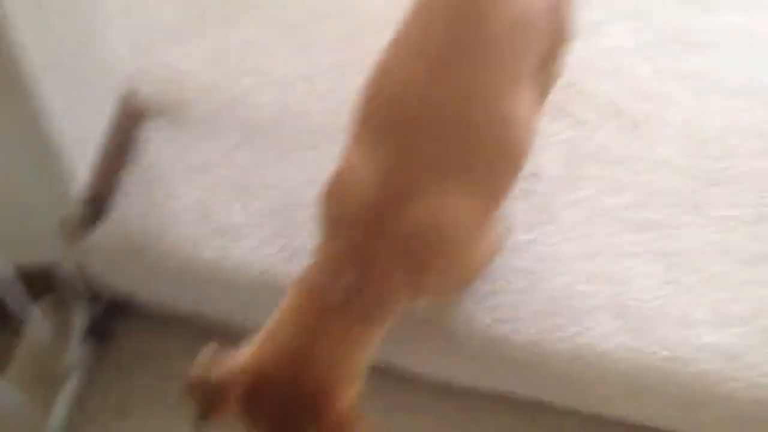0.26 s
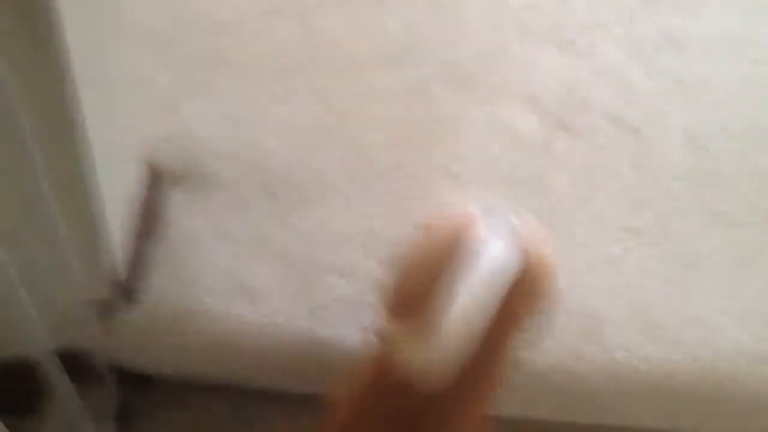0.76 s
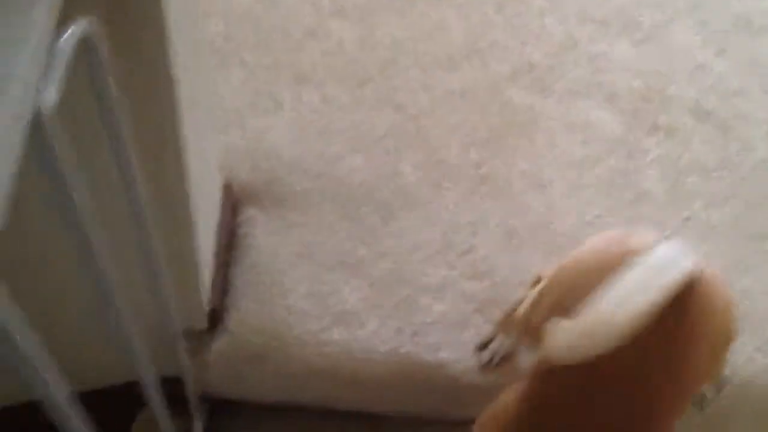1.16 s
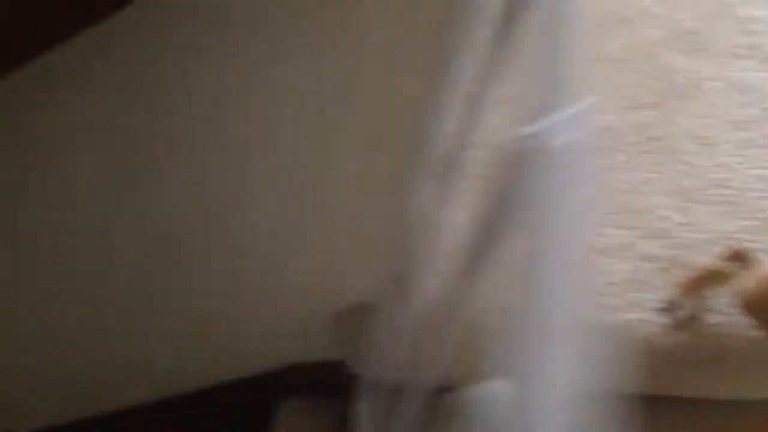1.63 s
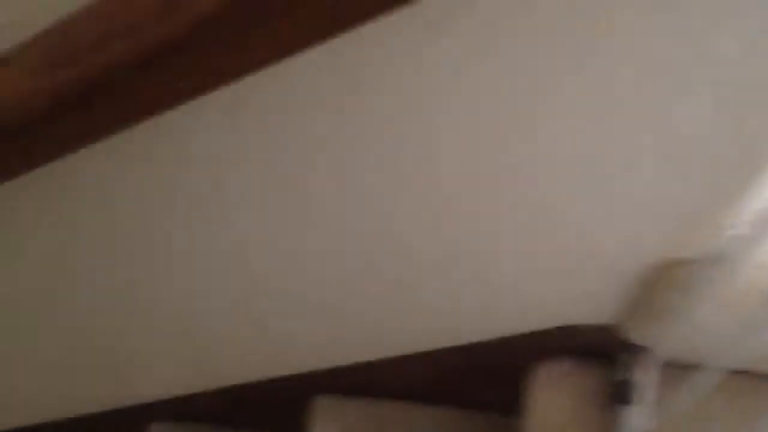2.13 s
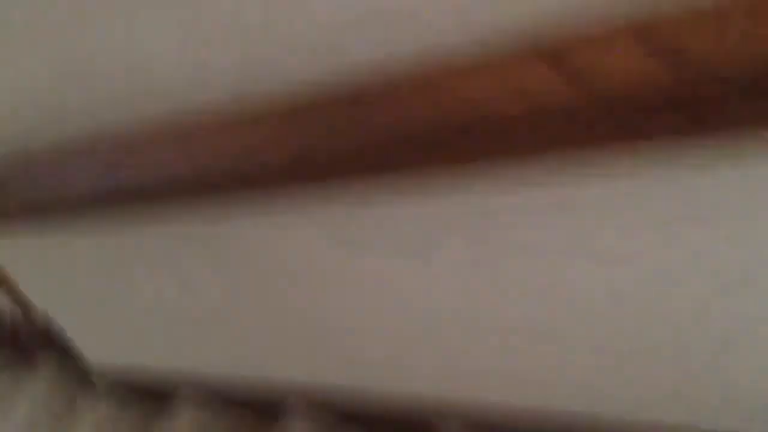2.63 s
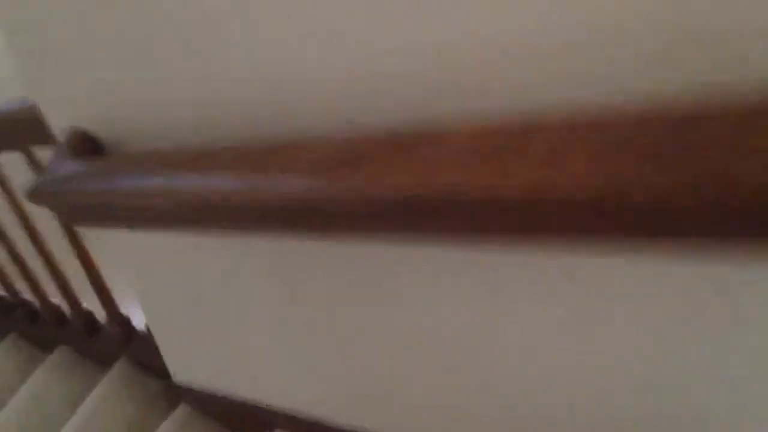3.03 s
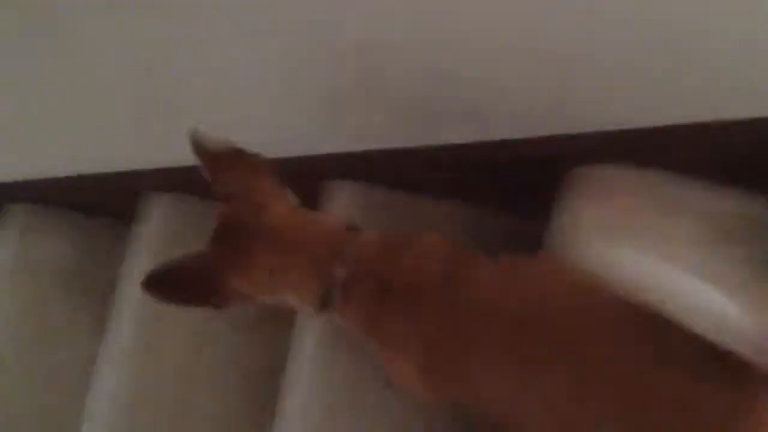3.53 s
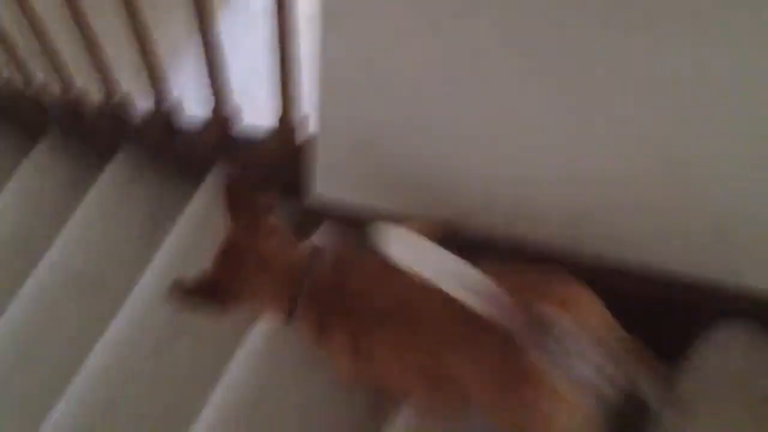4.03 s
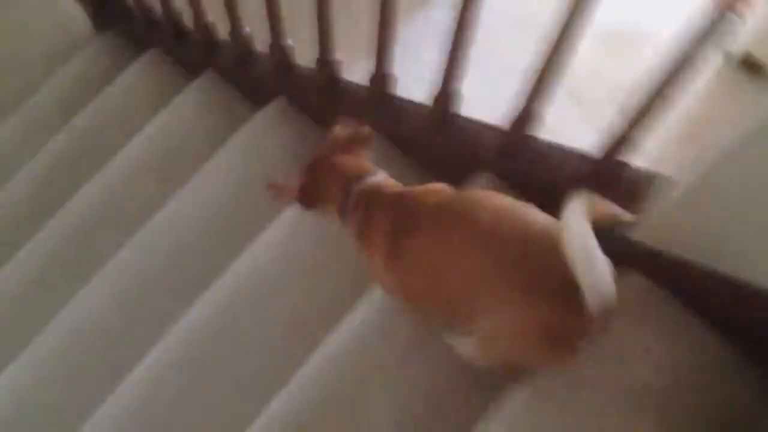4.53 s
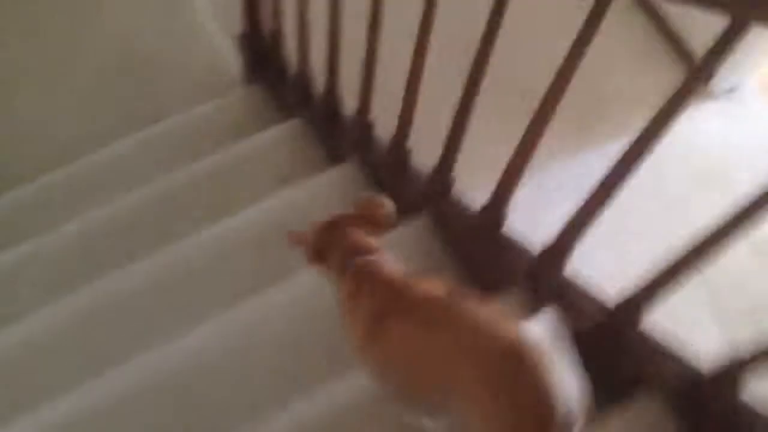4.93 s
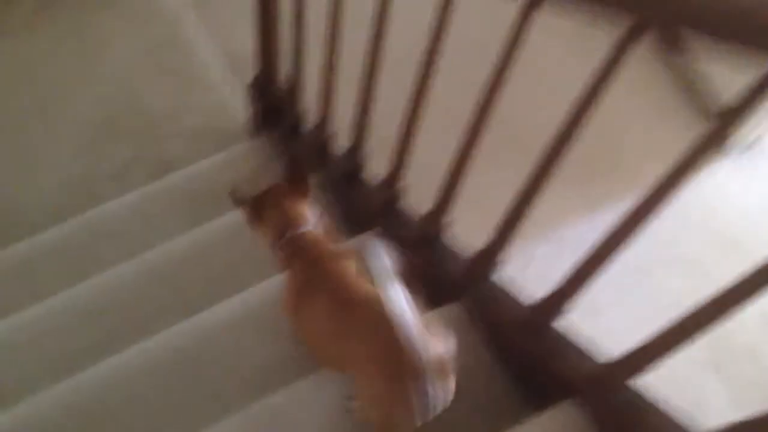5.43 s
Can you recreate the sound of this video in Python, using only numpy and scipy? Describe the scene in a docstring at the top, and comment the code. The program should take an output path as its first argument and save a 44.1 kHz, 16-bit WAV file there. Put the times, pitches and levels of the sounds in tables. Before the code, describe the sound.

A small handheld microphone is carried down a carpeted indoor stair, with thin bass and steady soft hiss throughout. At first there are only faint muffled thuds and carpet scuffs, with a short double metallic gate-latch clack around 0.3 s and a brief stairwell tail. A quiet lull follows, with a few weak steps near 1.5 s. At about 1.86 and 1.99 s two very loud, hard, bright ticks hit right at the microphone. Smaller ticks and dry rubbing follow; a sharp tick at 2.6 s leads to a cluster from 2.7 to 2.9 s, then a denser run of clicks and scrapes from 3.27 to 3.6 s. Dull footfalls grow more noticeable from 3.1 s. Scattered ticks continue to 3.9 s, a barely audible high squeak slides by near 4.4 s, and strong single clicks land at 4.48, 5.0 and 5.2 s. Lighter ticking and rubbing trail off to the end.

```python
"""One hears hard, bright ticks and dry rubbing at the microphone, thudding feet, a latch clack and steady hiss.
The place is a carpeted stair: someone carries a small camera down after a dog, which is itself not heard.
Close to the microphone a small hard thing rings in short modes, struck once per tick, by dense slips when rubbed.
Farther off, noise grains make thuds and scuffs on carpet, and a gate latch rings into the stairwell's tail.
Jolts push the microphone, and a faint gliding tone squeaks; the microphone cuts the bass and adds hiss."""
import sys
import numpy as np
from scipy import signal
from scipy.fft import rfft, irfft
from scipy.io import wavfile
from scipy.ndimage import uniform_filter1d

SR = 44100
rng = np.random.default_rng(int(sys.argv[2]) if len(sys.argv) > 2 else 0)


def boost_factor(decibels):
    """Convert a level in decibels to a linear amplitude factor."""
    exponent = np.asarray(decibels, float) / 20
    return 10 ** exponent


def generate_wav(signal):
    """Clip the signal to [-1, 1] and save it as 16-bit WAV at the path in sys.argv[1]."""
    frames = np.transpose(np.atleast_2d(signal))
    scaled = np.clip(frames, -1, 1) * 32767
    pcm = np.round(scaled).astype(np.int16)
    wavfile.write(sys.argv[1], SR, pcm)


N = 250929

# Levels in the tables are those ahead of the microphone's bass cut and soft ceiling.
# Hiss spectrum: (frequency [Hz], relative level per Hz [dB])
HISS_SPECTRUM = [(29, -59), (50, -32.5), (107, -4.5), (177, -0.5), (449, -9), (1040, -10.5), (1140, -8.5),
                 (1280, -9), (1840, -10.5), (2820, -13), (15000, -11.5)]
# Footfalls on the carpet:
# (time [s], length [s], thud rms level [dB], thud frequency [Hz], scuff rms level [dB])
FOOTFALLS = [(0.232, 0.14, -70, 227, -65), (0.317, 0.1, -67, 252, -66), (.419, .035, -70, 267, -70),
             (0.522, 0.064, -75, 248, -63.5), (0.628, 0.033, -62, 300, -63), (.672, .066, -62, 185, -71),
             (1.292, 0.038, -69, 260, -87), (1.52, 0.019, -57.5, 265, -80), (1.607, 0.014, -68, 278, -72),
             (1.896, 0.072, -58, 200, -63.5), (2.56, 0.075, -69, 196, -66), (2.657, 0.091, -58, 224, -68),
             (2.768, 0.046, -60, 140, -84), (2.802, 0.11, -61, 150, -70), (3.118, 0.06, -50.5, 188, -86),
             (3.178, 0.097, -56, 194, -68), (3.24, 0.22, -61, 215, -67.5), (3.449, 0.137, -54, 171, -67),
             (3.69, .08, -65, 210, -62), (3.777, 0.1, -53, 212, -59.5), (3.883, 0.089, -61, 212, -64.5),
             (3.984, 0.016, -59, 285, -55), (4.007, .055, -60, 190, -66), (4.064, 0.027, -64, 232, -62),
             (4.155, 0.016, -62, 318, -72), (4.268, 0.075, -55, 256, -70),
             (4.373, 0.072, -65.5, 201, -66.5), (4.445, 0.066, -66, 270, -64),
             (4.633, 0.065, -59.5, 270, -66.5), (4.692, 0.06, -72, 279, -65), (4.741, 0.02, -52, 136, -84),
             (4.81, 0.079, -59, 140, -82), (4.915, 0.033, -53, 282, -61.5), (4.951, .09, -63, 243, -63.5),
             (5.021, 0.1, -60.5, 180, -78), (5.171, 0.079, -60, 170, -85), (5.335, 0.13, -60, 191, -69),
             (5.458, 0.071, -72, 209, -65.5), (5.576, 0.032, -72, 296, -60), (5.608, .075, -65.5, 232, -66)]
# General shuffling between footfalls: (time [s], thud rms level [dB])
SHUFFLING = [(0, -73.5), (.2, -70), (.8, -70.5), (.95, -78.5), (1.5, -82), (1.65, -72), (2.0, -71.5),
             (2.3, -71.5), (3.05, -71), (3.6, -68.5), (4.2, -69), (4.6, -72.5), (5.1, -74.5), (5.69, -68)]
# Spectrum of scuffed carpet pile: (frequency [Hz], relative level per Hz [dB])
SCUFF_SPECTRUM = [(240, -54), (400, -2.5), (881, -5.5), (1260, -10.5), (1770, -13.5), (2660, -19.5),
                  (4500, -21.5), (5850, -36), (9900, -120)]
# Clacks of the gate latch, before the tail:
# (time [s], peak level [dB], most strongly struck frequency [Hz], breadth [octaves])
LATCH_CLACKS = [(0.1973, -51, 980, 0.33), (0.215, -53, 1250, 0.35), (0.281, -33.5, 1550, 1.3),
                (0.2957, -44, 1520, 1.1), (0.2962, -34, 1620, 3), (0.301, -47, 1420, 1.2),
                (0.313, -52, 1410, .6), (1.437, -64.5, 1150, .3), (1.614, -51, 1090, 0.23),
                (1.895, -56, 2600, 0.17)]
# Metal modes of the latch: (frequency [Hz], level [dB], time to fall 60 dB [s])
LATCH_MODES = [(483, -4, 0.014), (720, -3, 0.016), (1000, -3, .012), (1250, 0, .022), (1468, -1.5, 0.018),
               (1750, -5.5, 0.013), (2014, -1.5, .014), (2390, -4, .014), (3030, -5, .01),
               (3810, -4.5, 0.012), (4640, -11.5, 0.0088)]
# Blows and heavy steps that shake the whole camera: (time [s], peak level [dB], rise [s])
CAMERA_JOLTS = [(.634, -56, 0.00045), (1.522, -51.5, 0.00037), (1.856, -13, 0.00051),
                (1.9903, -21, 0.000053), (3.121, -55, 0.0011), (3.4101, -43, 0.00019),
                (4.271, -47, 0.00046), (4.641, -47, 0.00028), (4.7418, -30, 0.00028),
                (4.906, -38.5, 0.00023), (4.9088, -41, 0.00039), (5.0106, -45, 0.00014),
                (5.1956, -36.5, 0.000086), (5.6269, -34.5, 0.00025)]
# Ticks: (time [s], peak level of low ring [dB], of middle modes [dB], of top modes [dB],
#         of the push on the microphone [dB])
TICK_BLOWS = [(1.6613, -53, -38, -40, -65), (1.8553, -12, -2, 0.5, -21), (1.874, -50, -43, -47.5, -47),
              (1.9902, -18.5, -3, 0.5, -28), (2.0737, -44, -54, -36.5, -44), (2.0872, -47, -56, -41.5, -58),
              (2.124, -46, -33, -28.5, -42.5), (2.211, -33.5, -28, -25.5, -37.5),
              (2.2278, -56, -48, -32.5, -39), (2.2353, -28, -20.5, -14, -46),
              (2.2575, -39, -58, -33, -39.5), (2.5833, -22, -34, -7, -29), (2.7173, -49, -52, -28.5, -45),
              (2.7266, -17.5, -14, -14.5, -24), (2.733, -14.5, -7.5, -8, -33), (2.782, -19, -6.5, -4, -40),
              (2.8016, -43, -54, -49.5, -49), (2.811, -24.5, -18, -14.5, -38),
              (2.8332, -21, -10.5, -11, -35), (2.8425, -21, -19, -31, -30.5), (2.848, -29, -19.5, -20, -51),
              (2.8532, -19, -19.5, -17, -34), (2.8619, -17, -20.5, -10, -25.5),
              (2.8997, -29.5, -47, -20, -36.5), (3.0113, -60, -37.5, -35, -54),
              (3.2675, -22.5, -11.5, -7, -40), (3.277, -45, -24, -38, -59), (3.284, -25.5, -21, -17.5, -50),
              (3.2928, -24.5, -13, -15, -54), (3.3064, -31, -20.5, -14, -62),
              (3.3345, -33, -23, -17.5, -65), (3.3509, -31, -36, -39, -59), (3.3591, -27, -22, -19, -56),
              (3.3717, -33, -41, -29.5, -66), (3.3848, -37, -40, -34, -65), (3.3924, -23.5, -28, -9, -44),
              (3.4089, -16, -7.5, -2.5, -26), (3.4147, -27, -33, -6, -55), (3.4234, -20.5, -15, -22, -32),
              (3.43, -21.5, -13.5, -6, -49), (3.441, -25, -17, -34.5, -22), (3.515, -58, -39, -43, -62),
              (3.5334, -24, -29, -48, -32), (3.555, -33, -32, -43, -37), (3.5756, -44, -33, -33.5, -45),
              (3.5788, -27, -22.5, -19.5, -47), (3.7513, -42, -56, -32.5, -58),
              (3.7695, -54, -51, -25, -58), (3.7902, -24, -27, -19, -44), (3.8407, -23, -19.5, -25, -35),
              (3.8862, -24, -15, -21, -34), (3.907, -27, -20, -19, -57),
              (3.9251, -24.5, -12.5, -10.5, -36.5), (4.4845, -19, 0.5, -1.5, -62),
              (4.503, -38, -38, -50.5, -53), (4.7419, -35, -16, -19, -57), (4.7866, -41, -25, -24, -63),
              (5.0091, -13.5, -1.5, 3, -24), (5.0525, -45.5, -31, -31.5, -69), (5.103, -65, -46, -41, -65),
              (5.1976, -16, -11, -0.5, -22.5), (5.2121, -23, -12.5, -9, -55.5),
              (5.2237, -38.5, -28, -25.5, -48), (5.2468, -38.5, -35, -29, -60),
              (5.316, -23.5, -14, -19, -54), (5.3425, -55, -45, -42, -66), (5.3564, -29.5, -25, -23.5, -56),
              (5.365, -50, -50, -35.5, -65), (5.3709, -36, -40.5, -29, -55), (5.389, -44, -36, -25, -61),
              (5.3956, -29.5, -18, -14, -63), (5.4423, -26.5, -19, -12, -40),
              (5.4616, -48, -47.5, -50, -58), (5.6266, -40, -29.5, -35, -56)]
# Modes of what is ticked and rubbed: (frequency before detuning [Hz], width [Hz], level [dB])
BODY_MODES = [(3228, 304, 30.5), (4290, 250, 12), (4600, 290, -18), (5560, 1100, -22), (7990, 620, -4),
              (9100, 4400, 9), (10500, 1910, 9), (12180, 3270, 6.5), (14500, 1120, -13)]
# Rubbing strokes: (time [s], length [s], level at the start [dB], change by the end [dB],
#                   low ring relative to the rest [dB])
RUB_STROKES = [(1.856, 0.0084, -39.5, -1.5, -5), (2.006, .024, -67, -5, -18), (2.02, .04, -71, 1.5, -16),
               (2.057, 0.039, -69, 13, -3), (2.097, 0.083, -65, -15, -7), (2.183, 0.046, -63, 14.5, -5.5),
               (2.234, 0.059, -49.5, -16.5, -4.5), (2.295, 0.012, -63, -1, -2.5),
               (2.605, 0.024, -68.5, 18, -2), (2.629, .012, -70, -3, -11), (2.715, .011, -55, -1.5, -9),
               (2.805, .01, -62, 3, -8), (2.812, .013, -51, -1, 4), (2.835, 0.0049, -42, 0, 3),
               (2.846, 0.037, -48, -4, -8), (2.899, 0.035, -43.5, -33, -3.5), (2.941, .045, -71.5, 14, -6),
               (2.988, 0.072, -60, -8, -6), (3.109, 0.052, -71.5, -1.5, -4), (3.203, .045, -68, -8, -4),
               (3.275, 0.028, -44.5, -1, -2.5), (3.324, .043, -54.5, 8, -6), (3.371, .007, -53, 0, -5),
               (3.383, .006, -47, -1.5, 1.5), (3.391, 0.013, -40, -2, -4), (3.408, 0.013, -63, -1.5, 23),
               (3.425, 0.0024, -38.5, 1.5, 8), (3.428, 0.013, -40, -9, 7), (3.44, 0.066, -40, -28, -8),
               (3.502, .045, -53.5, 7.5, 0), (3.549, 0.015, -66, -3.5, 0), (3.562, 0.015, -58, -1.5, 1),
               (3.628, 0.11, -71.5, 4.5, 3.5), (3.714, 0.046, -55, 1.5, -6), (3.756, 0.029, -56.5, -8, -7),
               (3.785, 0.059, -56, 0.5, 0.5), (3.836, 0.052, -65.5, 0, 1), (3.885, 0.019, -48.5, -11.5, 7),
               (3.904, 0.011, -52, -1, 6), (3.927, 0.038, -52.5, -19, -3), (3.964, .02, -58.5, 1.5, 1),
               (3.984, 0.017, -55, -3.5, 7.5), (3.999, .065, -52, -10, -9.5), (4.058, 0.078, -72.5, 0, -10),
               (4.133, 0.097, -65, -3.5, -8), (4.272, 0.041, -69, -3, -12), (4.346, 0.06, -70, 0, -7),
               (4.49, .02, -56.5, -5, -0.5), (4.74, 0.027, -55.5, -21, 0), (4.774, .013, -62, 0, -3),
               (4.787, 0.0089, -42.5, -1.5, -6.5), (4.796, .015, -66, -7, -6),
               (5.014, 0.0067, -59.5, -3, -3), (5.02, .004, -45, -0.5, -17), (5.027, 0.044, -57, -6, -8),
               (5.213, 0.043, -54, -10, -6.5), (5.321, 0.034, -59, 2, 0), (5.358, 0.045, -52.5, -8, -4),
               (5.396, .028, -62, 7, -0.5), (5.447, 0.027, -52.5, -16, 5), (5.469, 0.08, -71, -6.5, 1),
               (5.628, .04, -64.5, 15.5, -5), (5.664, 0.023, -51.5, -14, -4.5)]
# Thin squeak that holds and slides down: (time [s], frequency [Hz], level [dB])
SQUEAK_GLIDE = [(4.365, 11000, -80), (4.38, 12000, -72), (4.402, 12040, -71), (4.415, 10600, -71),
                (4.432, 9600, -78)]

HISS_DB = -66
FOOT_FADE_DB, FOOT_RELEASE_S = -3.5, 0.007  # the foot eases off while it is down, then lifts
SHUFFLE_SCUFF_DB = -2  # scuffing against thudding
HOLLOW_HZ, MIDDLE_HZ, TOP_HZ = 4400, 6400, 9600  # where the groups of ticked modes part
SHEEN_HZ = 11000  # where the brightest rubbed modes begin
DETUNE, UNEVEN_DB = .012, 3  # spread of the modes from blow to blow: fraction of Hz, level
WEAK_DB = -12.5  # weak ticked modes, against the low ring beneath them
BOUNCE_S = .0018
SLIPS_PER_S, SLIP_SPREAD_DB = 14000, 2
RUB_ARCH = 0.21  # exponent: how round a stroke swells and sinks
SHEEN_DB = 1.5  # brightest rubbed modes against the upper ones
RUB_WEAK_DB = -9.5  # second and third modes added when rubbed, against the low ring
RUB_JUDDER_DB, RUB_JUDDER_S = 1.5, .004  # the sliding catches and lets go
CEILING = .9  # softly reached full swing


def evened(x):
    """Scales a signal to rms 1."""
    return x / np.sqrt(np.mean(x ** 2) + 1e-20)


def add(mix, s, sound):
    """Adds a sound to the mix at time s, cut off where the mix ends."""
    part = mix[round(s * SR):][:len(sound)]
    part += sound[:len(part)]


def coloured(x, points):
    """Filters x by a spectrum read on a log-frequency axis; rms 1."""
    hz, db = np.transpose(points)
    bins_hz = np.fft.rfftfreq(len(x), 1 / SR)
    gain = boost_factor(np.interp(np.log(bins_hz + 1), np.log(hz + 1), db))
    return evened(irfft(rfft(x) * gain, len(x)))


def grains(per_s, spread_db):
    """Random slips of random sign, most small and a few large."""
    size = boost_factor(spread_db * np.minimum(rng.exponential(1, N), 4))
    happens = rng.random(N) < per_s / SR
    return size * rng.standard_normal(N) * happens


def hiss():
    """Steady coloured noise of microphone and room."""
    return boost_factor(HISS_DB) * coloured(rng.standard_normal(N), HISS_SPECTRUM)


def feet(edge_s=0.003, thud_width_hz=260):
    """Lumpy low thuds, grains in a boom of the stairs, and a smoother scuffing of carpet pile."""
    t = np.arange(N) / SR
    shuffle = boost_factor(np.interp(t, *np.transpose(SHUFFLING)))
    powers = np.outer(shuffle, [1, boost_factor(SHUFFLE_SCUFF_DB)]) ** 2
    for s, length_s, thud_db, _, scuff_db in FOOTFALLS:
        u = t[:SR // 2]
        lift = np.exp(-np.maximum(u - length_s, 0) / FOOT_RELEASE_S)
        weight = boost_factor(FOOT_FADE_DB * u / length_s) * lift
        add(powers, s, np.outer(weight, boost_factor(np.array([thud_db, scuff_db]))) ** 2)

    starts, step_hz = np.transpose(FOOTFALLS)[[0, 3]]
    hz = step_hz[np.searchsorted(starts[1:], t)]  # held until the next footfall
    hz, thud, scuff = uniform_filter1d([hz, *np.sqrt(powers.T)], round(edge_s * SR))

    # a resonance of moving frequency: shift down, smooth with two equal poles, shift back up
    turn = np.exp(2j * np.pi * np.cumsum(hz) / SR)
    r = np.exp(-np.pi * thud_width_hz / SR)
    blows = grains(1500, spread_db=2.5)
    boom = (turn * signal.lfilter([1], [1, -2 * r, r * r], blows / turn)).real
    pile = coloured(grains(5000, spread_db=1.5), SCUFF_SPECTRUM)
    return thud * evened(boom) + scuff * pile


def latch(room_db=-3, room_t60=0.37):
    """Short metal modes, struck most near one frequency, and the stairwell's tail behind them."""
    out, t = np.zeros(N), np.arange(6000) / SR
    hz, db, t60 = np.transpose(LATCH_MODES)[:, :, None]
    phases = rng.random((len(LATCH_CLACKS), len(LATCH_MODES), 1))
    for (s, peak_db, struck_hz, breadth), phase in zip(LATCH_CLACKS, phases):
        struck_db = db - 10 * (np.log2(hz / struck_hz) / breadth) ** 2
        modes = boost_factor(struck_db - 60 * t / t60) * np.sin(2 * np.pi * (hz * t + phase))
        sound = modes.sum(0) * (1 - np.exp(-t / .0012))  # softened onset
        add(out, s, boost_factor(peak_db) * sound / abs(sound).max())

    late = np.arange(SR // 2) / SR
    tail = rng.standard_normal(len(late)) * boost_factor(-60 * late / room_t60) * (late > .004)
    tail = tail / np.linalg.norm(tail)
    return out + boost_factor(room_db) * signal.oaconvolve(out, tail)[:N]


def push(db, rise_s):
    """A one-sided shove of the microphone, at its peak after rise_s."""
    u = np.arange(600) / SR / rise_s
    return boost_factor(db) * u * np.exp(1 - u)


def jolts():
    """Shoves of the whole camera; the microphone's bass cut makes them swing back."""
    out = np.zeros(N)
    for s, db, rise_s in CAMERA_JOLTS:
        add(out, s, push(db, rise_s))
    return out


def rings(detune, rise_cycles):
    """The modes of the body after one blow, one row each; neighbours swing in opposite senses."""
    hz, width, db = np.transpose(BODY_MODES)[:, :, None]
    t = np.arange(1200) / SR
    rise = 1 - np.exp(-t * hz / rise_cycles)
    shape = boost_factor(db) * np.exp(-np.pi * width * t) * rise
    sense = -(-1.) ** np.arange(len(BODY_MODES))[:, None]
    return sense * shape * np.sin(2 * np.pi * hz * detune * t)


def ticks(rise_cycles=0.36, push_s=.00007, rattle_db=-28, rattle_s=0.0011, bounce_db=-20):
    """Each blow lands elsewhere, so the groups of modes and the push take different shares."""
    out, t = np.zeros(N), np.arange(1200) / SR
    group = np.digitize(np.transpose(BODY_MODES)[0], [HOLLOW_HZ, MIDDLE_HZ, TOP_HZ])
    for s, ring_db, middle_db, top_db, push_db in TICK_BLOWS:
        tune, share = rng.standard_normal((2, len(BODY_MODES), 1))
        modes = rings(1 + DETUNE * tune, rise_cycles) * boost_factor(UNEVEN_DB * share)
        sound = np.zeros(len(t))
        for k, db in enumerate([ring_db, ring_db + WEAK_DB, middle_db, top_db]):
            part = modes[group == k].sum(0)
            sound += boost_factor(db) * part / abs(signal.hilbert(part)).max()

        # the part chatters as it settles
        rattle = boost_factor(rattle_db) * rng.standard_normal(len(t)) * np.exp(-t / rattle_s)
        add(out, s, sound + np.convolve(sound[:150], rattle)[:len(t)])
        add(out, s + BOUNCE_S, boost_factor(bounce_db) * sound)  # one small rebound
        add(out, s, push(push_db, push_s))
    return out


def rubs(edge_s=0.0018, under_db=-26, hollow_hz=6900):
    """Dense small slips, each at another spot, excite the same modes while the part slides."""
    spots = rng.choice([-1., 1.], (len(BODY_MODES), N))
    slips = grains(SLIPS_PER_S, SLIP_SPREAD_DB) * spots
    modes = signal.oaconvolve(slips, rings(0.98, 0.68), axes=1)[:, :N]
    group = np.digitize(np.transpose(BODY_MODES)[0], [MIDDLE_HZ, SHEEN_HZ])
    ring, upper, sheen = (modes[group == k].sum(0) for k in range(3))

    # light slips leave a hollow under the upper modes
    above = signal.butter(3, hollow_hz, "high", fs=SR, output="sos")
    upper, sheen = signal.sosfilt(above, [upper, sheen])
    bright = evened(upper) + boost_factor(SHEEN_DB) * evened(sheen)
    weak = evened(evened(modes[1]) + evened(modes[2]))
    low = evened(ring) + boost_factor(RUB_WEAK_DB) * weak + boost_factor(under_db) * evened(slips[0])

    levels = np.zeros((N, 2))
    for s, length_s, db, gained_db, ring_db in RUB_STROKES:
        u = np.arange(0, length_s, 1 / SR) / length_s
        arch = np.sin(np.pi * u) ** RUB_ARCH * boost_factor(gained_db * u)
        add(levels, s, np.outer(arch, boost_factor(np.array([db, db + ring_db]))))
    levels = uniform_filter1d(levels.T, round(edge_s * SR))

    wander = uniform_filter1d(rng.standard_normal(N), round(RUB_JUDDER_S * SR))
    judder = boost_factor(RUB_JUDDER_DB * evened(wander))
    return (levels * np.array([bright, low])).sum(0) * evened(judder)


def squeak():
    """One faint sine whose frequency and level glide from point to point."""
    s, hz, db = np.transpose(SQUEAK_GLIDE)
    t = np.arange(N) / SR
    level = boost_factor(np.interp(t, s, db, -200, -200))
    return level * np.sin(2 * np.pi * np.cumsum(np.interp(t, s, hz)) / SR)


def scene():
    """All sources on the stairs and at the camera, one channel."""
    return (feet() + latch() + jolts() + ticks() + rubs() + squeak())[None]


def low_pass(x):
    """Removes everything above the highest recorded frequency."""
    return signal.sosfilt(signal.butter(12, 16570, fs=SR, output="sos"), x)


def record(dry, cut_hz=125, edge_hz=15400, leak_db=-25):
    """The microphone drops the bass and adds hiss, loud peaks round off, the top treble falls off a cliff."""
    bass_cut = signal.butter(4, cut_hz, "high", fs=SR, output="sos")
    x = signal.sosfilt(bass_cut, dry) + hiss()
    x = CEILING * np.tanh(x / CEILING)  # the loudest ticks are rounded off
    dull = signal.oaconvolve(x, signal.firwin(201, edge_hz, fs=SR)[None], "same")
    mix = dull + boost_factor(leak_db) * (x - dull)  # a little treble remains above the edge
    return low_pass(mix)


dry = scene()
out = record(dry)
generate_wav(out)
```